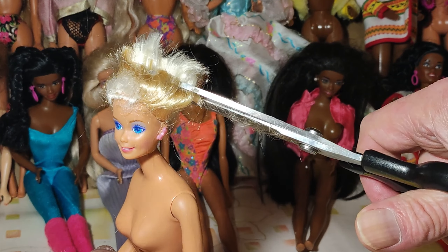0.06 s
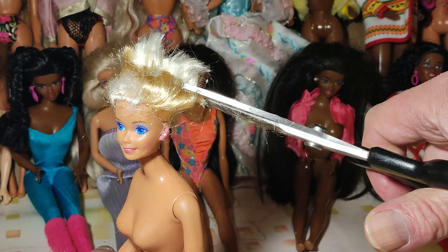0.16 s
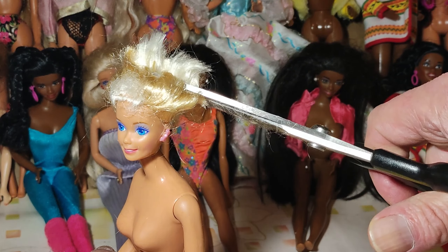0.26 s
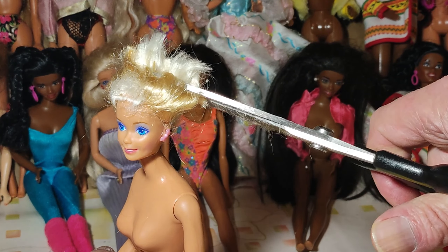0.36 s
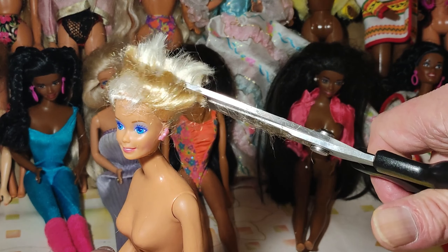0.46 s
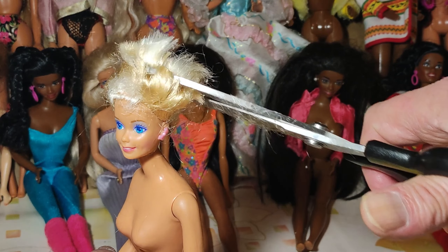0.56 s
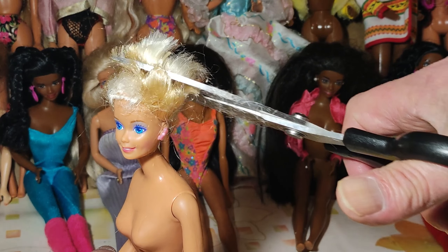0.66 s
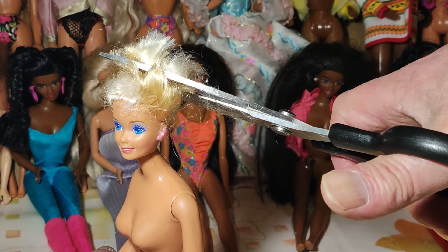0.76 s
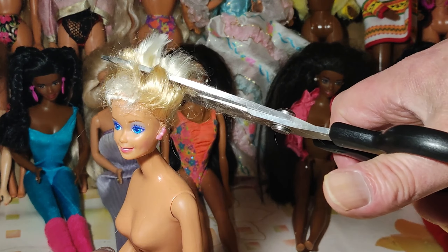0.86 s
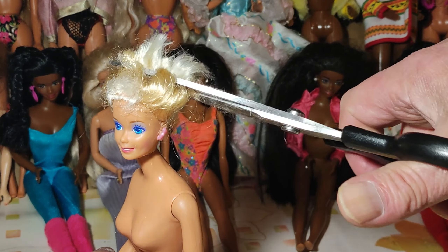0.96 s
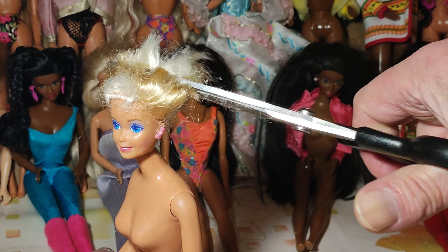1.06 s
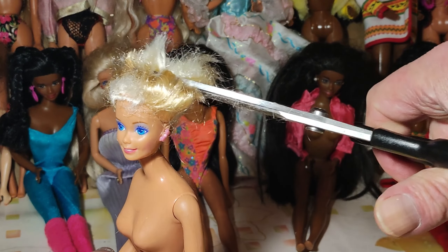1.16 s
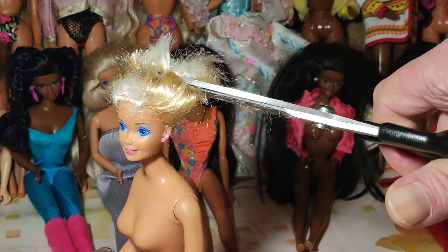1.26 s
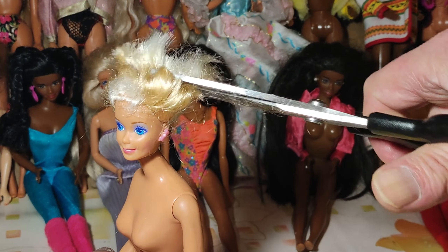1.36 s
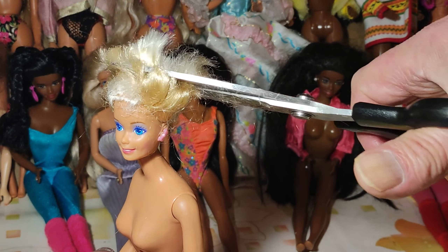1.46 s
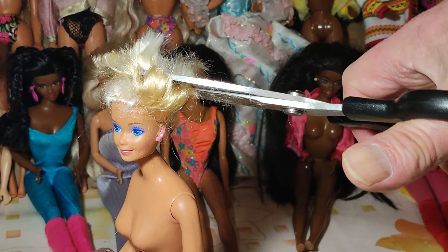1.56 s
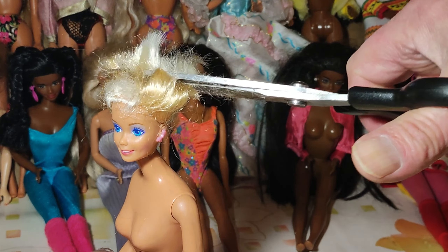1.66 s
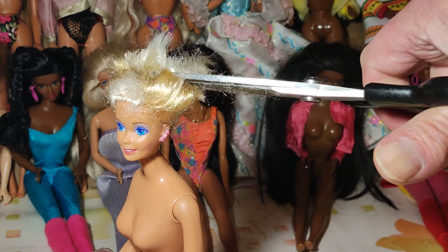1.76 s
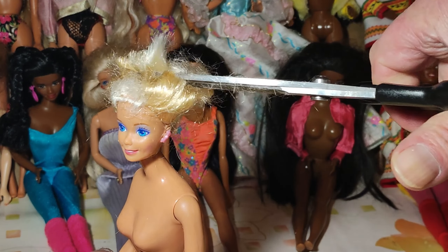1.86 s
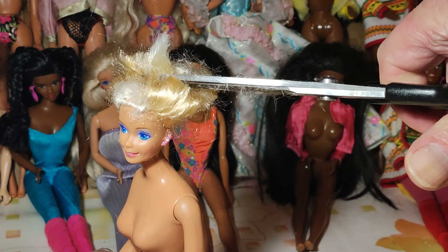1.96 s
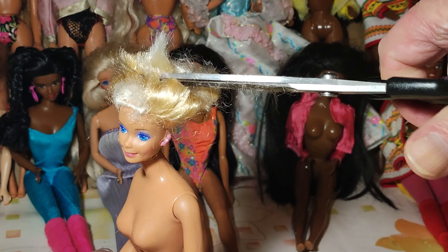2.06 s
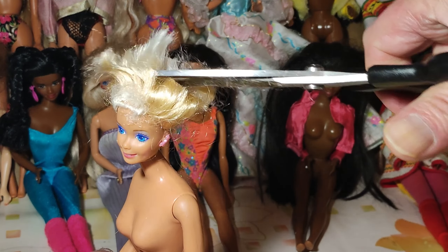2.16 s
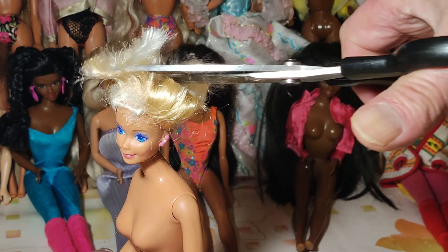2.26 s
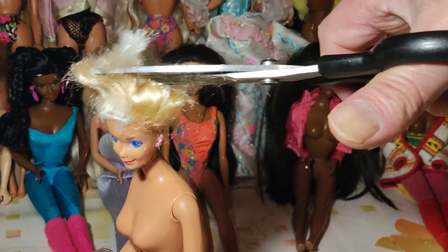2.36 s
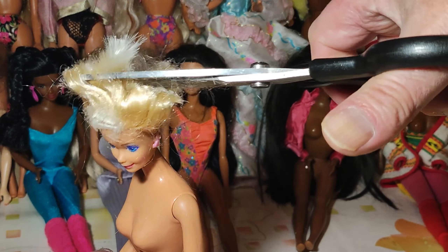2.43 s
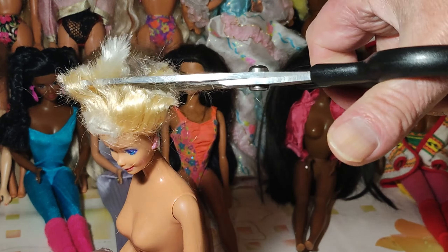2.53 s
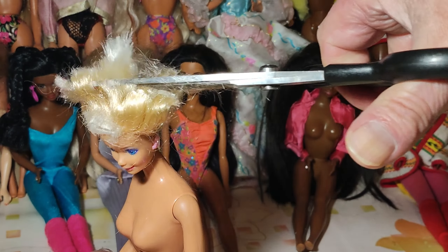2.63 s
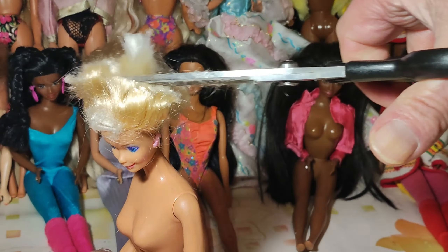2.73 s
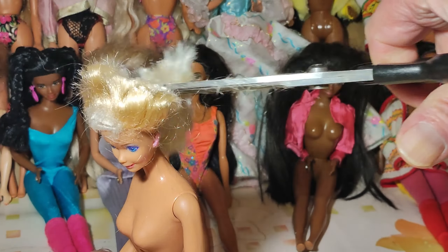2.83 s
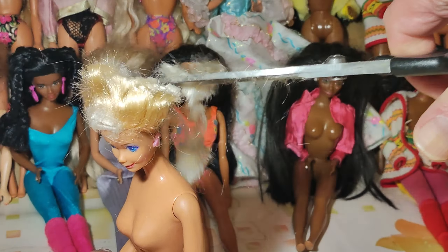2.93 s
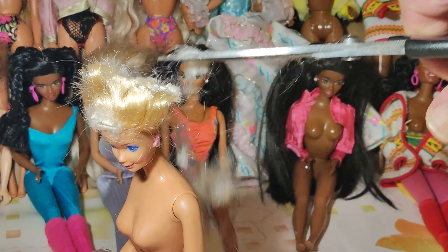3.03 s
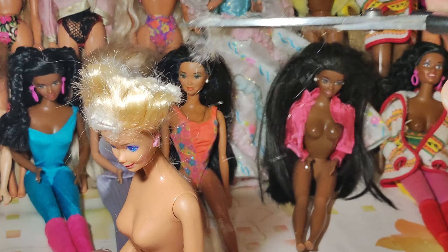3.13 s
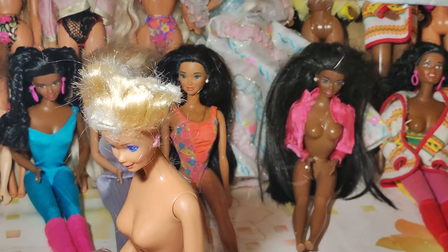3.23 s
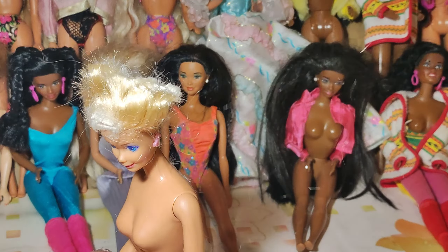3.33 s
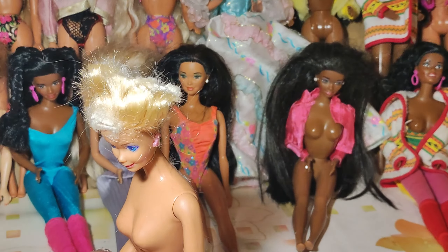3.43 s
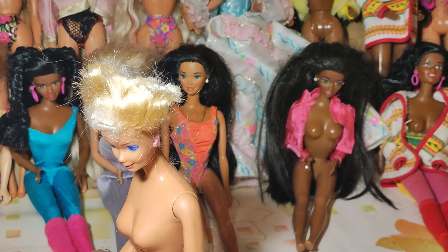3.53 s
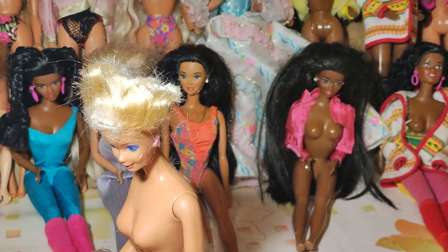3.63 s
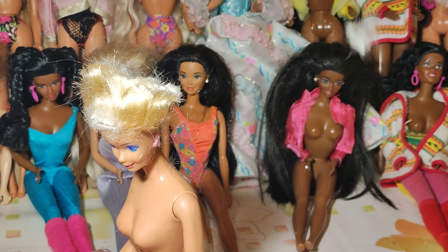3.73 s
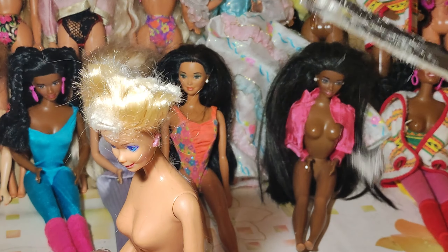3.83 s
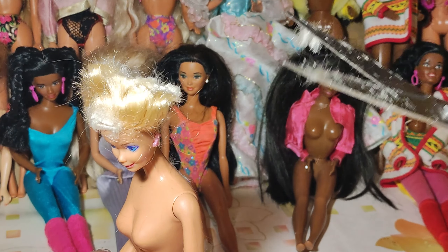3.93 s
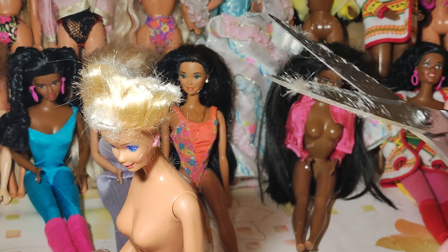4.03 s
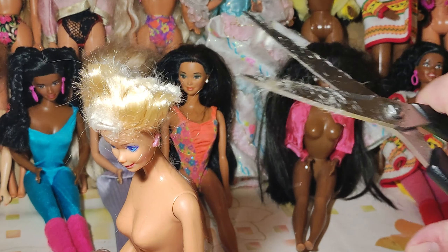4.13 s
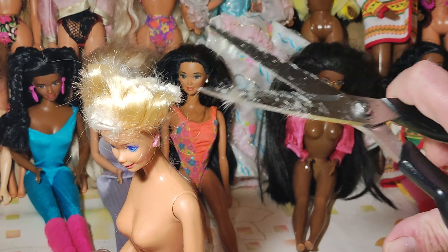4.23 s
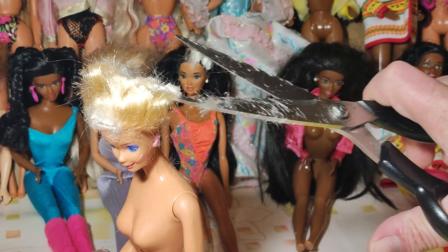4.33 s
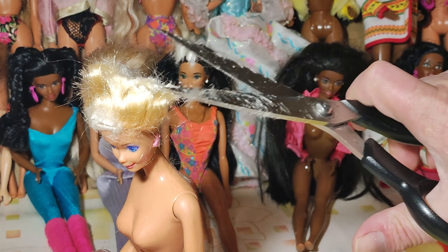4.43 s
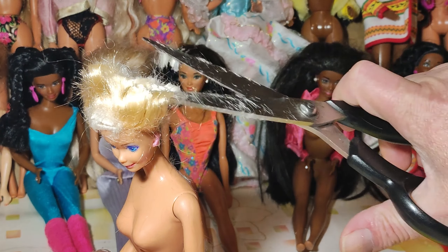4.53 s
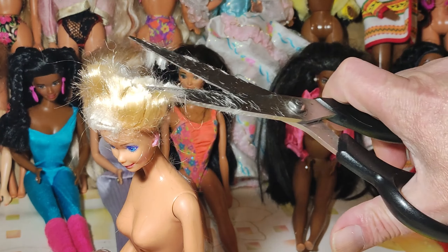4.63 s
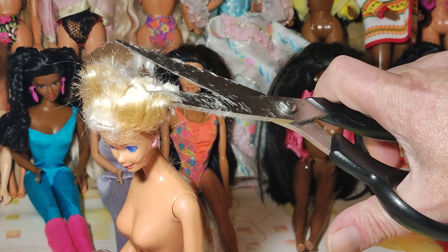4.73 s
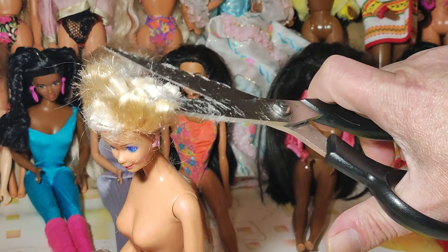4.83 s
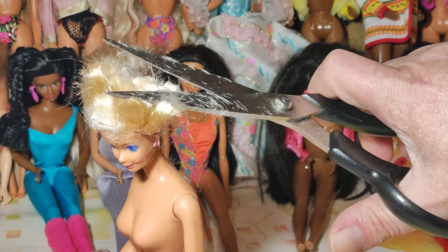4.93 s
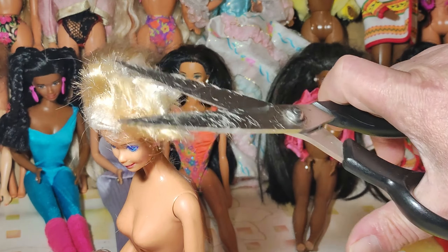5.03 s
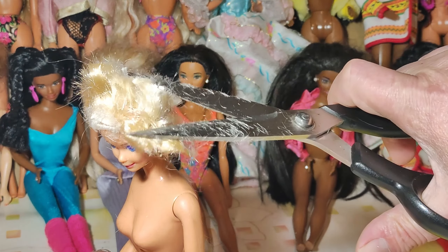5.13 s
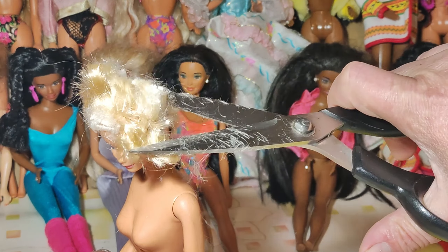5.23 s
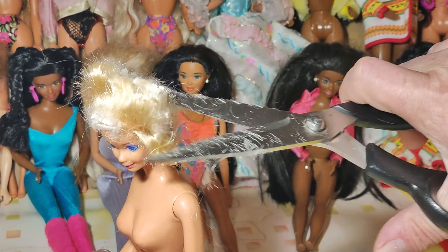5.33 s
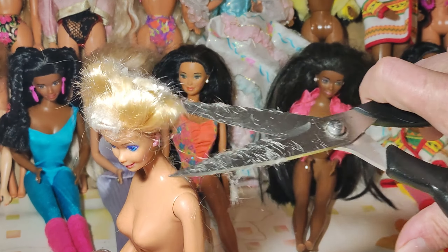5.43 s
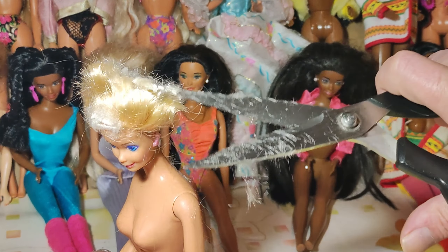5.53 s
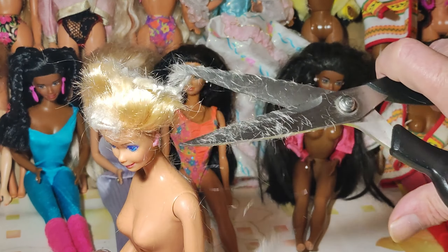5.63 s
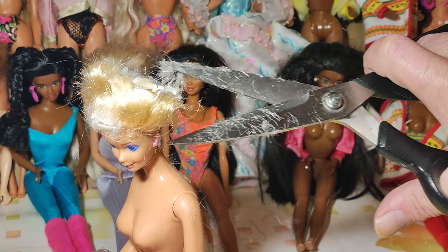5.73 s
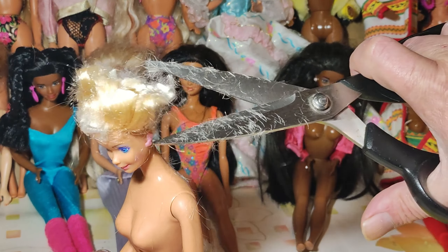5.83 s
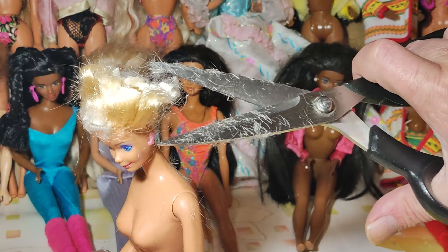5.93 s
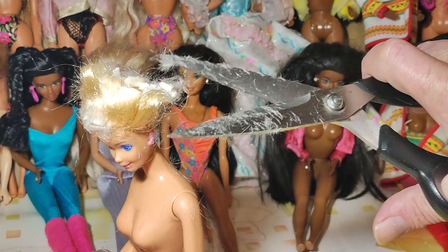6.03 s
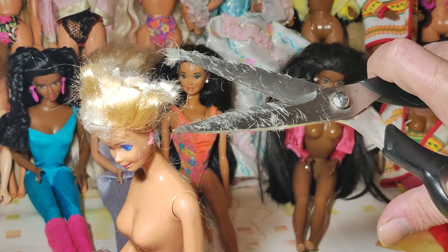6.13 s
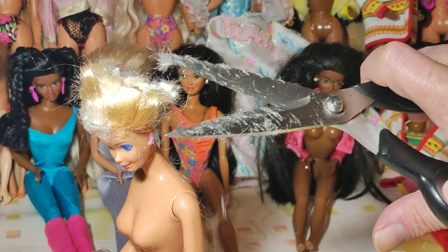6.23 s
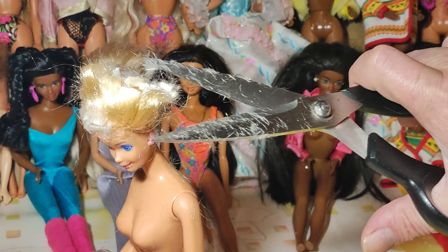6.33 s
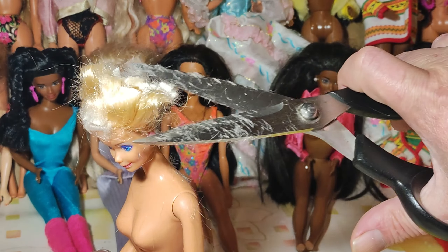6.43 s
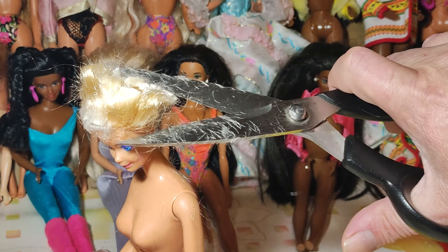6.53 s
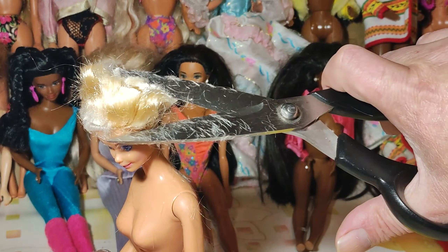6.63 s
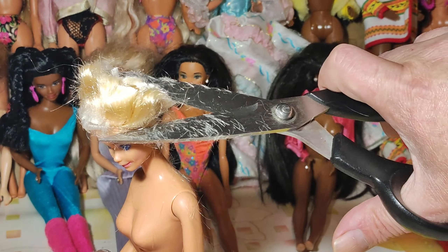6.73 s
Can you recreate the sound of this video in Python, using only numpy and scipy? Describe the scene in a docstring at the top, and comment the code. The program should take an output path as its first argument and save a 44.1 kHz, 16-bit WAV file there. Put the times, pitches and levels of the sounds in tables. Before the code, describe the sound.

Close, crisp scissor cuts through stiff plastic hair, each swelling to a crackling snip, followed by a clean shut, quiet rustles and small table bumps.

```python
"""Steel scissors chew through tufts of synthetic hair close to two ports: dense random snaps ring blade modes.
Short contacts and rattles at pivot or tips tick in the same modes; the blades shut once in a clean blow.
Decaying sines under grainy scrapes are the knocks of handles and table; faint handling rustles follow the cuts.
Echoes surround all near sounds. Lumpy low noise rumbles in gusts that mostly favour one port, with single
pressure bumps. A dull noise wash, perhaps far traffic, fades over the room's quiet hiss."""
import sys
import numpy as np
from scipy import signal
from scipy.fft import rfft, irfft, next_fast_len
from scipy.io import wavfile

SR = 44100
rng = np.random.default_rng(int(sys.argv[2]) if len(sys.argv) > 2 else 0)


def unload_wav(signal):
    """Save mono or channel-first audio to the path in sys.argv[1] as 16-bit WAV at rate SR, clipped to [-1, 1]."""
    wavfile.write(
        sys.argv[1],
        SR,
        np.round(np.clip(np.atleast_2d(signal).T, -1, 1) * 32767).astype(np.int16),
    )


N = 299439

CONTACT_FAVOUR_WIDTH = 0.1  # of ticks and the shut blow, in log frequency


def from_db(db):
    """Decibels to amplitude gain."""
    return 10 ** (np.asarray(db, float) / 20)


def rms_one(x):
    """Scale to unit power."""
    return x / np.sqrt(np.mean(x ** 2) + 1e-20)


def in_time(rows, t):
    """Columns of a curve, joined by straight lines."""
    s, *columns = np.transpose(rows)
    return [np.interp(t, s, column) for column in columns]


def coloured(spectrum):
    """Two unrelated noises whose power per Hz follows the spectrum, interpolated in log frequency."""
    size = next_fast_len(N)
    hz = np.maximum(np.arange(size // 2 + 1) * SR / size, 1)
    points = np.array(spectrum, float)
    density_db = np.interp(np.log(hz), np.log(points[:, 0]), points[:, 1])
    gain = from_db(density_db) * np.sqrt(SR / 2)
    return irfft(rfft(rng.standard_normal((2, size))) * gain, size)[:, :N]


def drift(rate_hz):
    """Slow random wander, rms 1: two-pole low-passed noise, drawn at every 20th sample."""
    step, warm_up = 20, 2000
    r = np.exp(-2 * np.pi * rate_hz * step / SR)
    noise = rng.standard_normal(N // step + warm_up + 2)
    slow = rms_one(signal.lfilter([1], [1, -2 * r, r * r], noise)[warm_up:])
    return np.interp(np.arange(N) / step, np.arange(len(slow)), slow)


def resonance(x, hz, width_hz):
    """Two-pole resonance, gain 1 on top."""
    r = np.exp(-np.pi * width_hz / SR)
    zeros = (1 - r * r) / 2 * np.array([1, 0, -1])
    poles = [1, -2 * r * np.cos(2 * np.pi * hz / SR), r * r]
    return signal.lfilter(zeros, poles, x + 1e-18)


def dying(start_s, db, t60_s, rise_s):
    """Place and envelope of one burst: quick rise, exponential fall."""
    start = round(start_s * SR)
    age = np.arange(min(int(4.2 * t60_s * SR) + 2, N - start)) / SR
    shape = from_db(db - 60 * age / t60_s) * (1 - np.exp(-age / rise_s))
    return slice(start, start + len(age)), shape


def lift_db(hz, favoured_hz, most_db, width):
    """Extra drive of a mode near the favoured pitch, bell-shaped in log frequency."""
    return most_db * np.exp(-(np.log(hz / favoured_hz) / width) ** 2)


def shearing():
    """The snaps swell, hold or fade along each stroke, change colour, and jump when a bundle gives way."""
    # strokes through hair, and from 4.27 s faint handling scrapes and rustles:
    #   (start [s], stroke length [s], first and last drive [dB], t60 after it [s],
    #   handle, rasp, middle, top modes over bright ones [dB],
    #   rasp and top loss over the stroke [dB], left over right [dB])
    strokes = [(0.03, 0.032, -64, -63.5, 0.2, 0, 8, 2.5, -2, 8, 4, 1.5),
               (0.175, 0.11, -58.5, -49.5, 0.057, -3, 3.5, 3, 1, 5.5, 4, -2),
               (0.299, 0.092, -61, -45.5, 0.15, -8, -7, 1.5, -5, 3, 4, -1),
               (0.927, 0.027, -56, -52, 0.044, -19, -19, -20, -7, -9, 0, 2.5),
               (0.977, 0.16, -44, -27, 0.12, -4, 0, -4, 0.5, 2.5, 11.5, -2),
               (1.688, 0.054, -61.5, -50.5, 0.15, -2, -5, -2, -2, -5, 3, -4),
               (1.789, 0.019, -57, -47, 0.05, -5, -4, 6.5, -6, 5, 0, -3),
               (1.807, 0.051, -35.5, -32.5, 0.23, -7, -2, -6, -24, 7, -10, 0.5),
               (1.985, 0.044, -45, -48, 0.061, -2, -3, -3, -7, 7, -1, -1),
               (2.478, 0.18, -64, -32.5, 0.17, -2.5, -1, -2, 1.5, -4, 15, -1),
               (2.694, 0.028, -30, -30, 0.024, -21, -6, -7.5, -4, 5, -1, -1.5),
               (2.753, 0.05, -40, -50.5, 0.12, -20, -14.5, -10, -7.5, -1.5, 5, -5),
               (2.84, 0.0042, -46, -46, 0.26, -20, -13, -8, -19, -2, -4, 1.5),
               (4.27, 0.022, -71, -67.5, 0.13, -0.5, 1, 1.5, -8, 2, 0, -3.5),
               (4.362, 0.016, -58, -55, 0.21, 9, -1.5, -11.5, -22.5, 1.5, 3, -2),
               (4.57, 0.28, -78.5, -71, .4, -1.5, -2, 0.5, -11, 9, 0.5, -0.5),
               (4.85, 0.058, -75.5, -77, 0.18, 1, -8.5, -10, -11.5, -1, 3, -3),
               (5.35, 0.025, -82.5, -56, 0.068, -20, -23.5, -10, -9, 0.5, 3.5, -2.5),
               (5.43, 0.051, -69.5, -77, 0.1, -10, -6.5, -12.5, -11.5, 0, 0, -3.5)]
    # bundles giving way: (time [s], drive [dB], t60 [s], favoured pitch [Hz], rasp lift [dB])
    bundles = [(0.054, -52, 0.0099, 8000, 7), (0.176, -46.5, 0.012, 9700, 5),
               (0.211, -50, 0.013, 9700, 4.5), (0.2187, -44, 0.0078, 7800, 8),
               (0.2676, -44, 0.024, 7260, 4), (0.3351, -55, 0.049, 7240, 7), (0.3715, -50, 0.027, 7350, 9),
               (0.9413, -41, 0.028, 8400, 0), (0.9815, -28, 0.011, 8850, 3), (1.002, -34, 0.0085, 8300, 0),
               (1.0237, -32, 0.066, 8200, 2), (1.042, -29, 0.041, 8350, -0.5),
               (1.059, -31, 0.031, 8600, 3.5), (1.072, -27, 0.023, 8550, 1.5),
               (1.092, -30, 0.079, 7100, -2), (1.124, -24, 0.017, 7700, -0.5),
               (1.145, -15.5, 0.0058, 7540, 0), (1.155, -15, 0.021, 8000, 0), (1.8053, -32, 0.032, 7730, 0),
               (1.829, -32, 0.03, 7500, 2.5), (1.8472, -21.5, 0.015, 7930, -2),
               (1.8668, -13.5, 0.028, 7600, 2), (1.884, -29, 0.0064, 8500, 0), (1.971, -32, 0.023, 8100, 4),
               (1.986, -25.5, 0.031, 8040, -4), (2.012, -29.5, 0.042, 8360, 6),
               (2.4844, -57.5, .02, 9240, -8), (2.5275, -43.5, 0.017, 9400, 3), (2.5596, -39, .02, 9500, 1),
               (2.5695, -46.5, 0.02, 7200, 5.5), (2.5936, -31.5, 0.013, 7280, 4),
               (2.605, -36.5, 0.0076, 7300, 1), (2.62, -30.5, 0.043, 7360, -2.5),
               (2.627, -28.5, 0.053, 7720, -3), (2.65, -20.5, 0.023, 7700, 0),
               (2.667, -22, 0.045, 8000, -4), (2.695, -18, 0.04, 7640, 0.5), (2.7208, -15, 0.026, 7400, 1),
               (2.84, -43, 0.02, 7400, -1.5)]
    # thick strands cracking alone: (time [s], relative level [dB])
    strands = [(0.2189, -34), (0.2584, -35), (0.2693, -34), (0.3735, -35), (0.3784, -35), (0.3824, -34),
               (0.3934, -33), (0.3984, -35), (0.4144, -39), (1.0934, -17), (1.0969, -16), (1.1044, -17),
               (1.1114, -17), (1.1194, -15), (1.1438, -14), (1.8282, -20), (1.8334, -20), (1.8472, -18),
               (1.8677, -12), (1.8724, -15), (1.8844, -21), (1.8964, -26), (2.5955, -27), (2.6274, -17),
               (2.6703, -15), (2.6953, -12), (2.7202, -9)]
    bite_s, bundle_rise_s = 0.003, 0.002
    middle_loss_db = 1.5
    first_snap_db, strand_blow_db = 7.5, 6  # single-sample blows over the table levels
    favour_db, favour_width = 7.5, 0.082
    own_share_low, own_share_high = 0.28, 0.5  # power unrelated between ports
    mode_wander_db, mode_wander_hz = 3, 45.0

    t = np.arange(N) / SR
    force, shares_db, pan_db = np.zeros(N), np.zeros((4, N)), np.zeros(N)
    for s, length, first_db, last_db, t60, *start_db, rasp_loss_db, top_loss_db, side_db in strokes:
        later = slice(int(s * SR) + 1, N)
        age = t[later] - s
        progress = np.minimum(age / length, 1)
        level_db = first_db + (last_db - first_db) * progress - 60 * np.maximum(age - length, 0) / t60
        force[later] += from_db(level_db) * (1 - np.exp(-age / bite_s))
        loss_db = np.outer([0, rasp_loss_db, middle_loss_db, top_loss_db], progress)
        shares_db[:, later] = np.array(start_db)[:, None] - loss_db
        pan_db[later] = side_db

    firsts, favoured_hz = np.zeros(N), np.ones(N)
    for s, db, t60, hz, rasp_db in bundles:
        span, shape = dying(s, db, t60, bundle_rise_s)
        force[span] += shape
        firsts[span.start] = from_db(db + first_snap_db)
        favoured_hz[span.start:] = hz
        shares_db[1, span.start:span.start + round(t60 * SR)] += rasp_db
    for s, db in strands:
        firsts[round(s * SR)] = from_db(db + strand_blow_db)

    common, own = snaps(), np.array([snaps(), snaps()])
    sides = from_db(np.outer([0.5, -0.5], pan_db))

    def drive(own_share):
        texture = np.sqrt(1 - own_share) * common + np.sqrt(own_share) * own
        return sides * (firsts + force * texture)

    def strength(hz):
        wander_db = mode_wander_db * drift(mode_wander_hz)
        return from_db(wander_db + lift_db(hz, favoured_hz, favour_db, favour_width))

    low, high = drive(own_share_low), drive(own_share_high)
    handle, rasp, middle, top = from_db(shares_db)
    return blades([low, low, low, high, high], [handle, rasp, middle, 1, top], strength)


def snaps():
    """Strands break at random moments with uneven force, over the hiss of steel on steel; rms 1."""
    median_rate_hz, rate_wander_db, rate_wander_hz = 2200, 5.0, 200.0
    size_spread_db = 4.8
    size_db = size_spread_db * np.minimum(rng.exponential(1, N), 3.5)
    sizes = from_db(size_db) * rng.choice([-1, 1], N)
    chance = median_rate_hz * from_db(rate_wander_db * drift(rate_wander_hz)) / SR
    breaks = sizes * (rng.random(N) < chance)
    return rms_one(rms_one(breaks) + 0.42 * rng.standard_normal(N))


def blades(drives, shares, strength, turn=-1):
    """Parallel modes hear the blows by family share and mode strength; turn=-1 alternates their polarity."""
    # scissor modes, low to high family: (frequency [Hz], width [Hz], gain [dB])
    handle_modes = [(250.7, 120, -1.5), (423, 190, -8)]
    rasp_modes = [(930, 170, -7), (1510, 340, -7.5), (2330, 280, 10), (2605, 320, 12)]
    middle_modes = [(1711, 380, -12.5), (2060, 430, -3.5), (2810, 1020, 6.5), (3410, 300, 10),
                    (3620, 380, 7), (4190, 180, 7.5), (4340, 79, 9), (5040, 350, 5), (5330, 250, 6.5),
                    (6000, 350, 2.5), (6480, 280, 8)]
    bright_modes = [(7000, 200, 5.3), (7330, 310, 5), (7595, 530, 4.7), (8130, 310, 4.65),
                    (8590, 240, 2.74), (9010, 240, 3.9), (9380, 120, 5.1), (10060, 97, 1)]
    top_modes = [(10590, 500, 6.5), (12200, 900, 4.5), (12700, 770, 5.5), (14450, 480, 6), (14680, 500, 5),
                 (15580, 190, 2.3)]
    families = (handle_modes, rasp_modes, middle_modes, bright_modes, top_modes)
    out, sign = 0, 1
    for drive, share, family in zip(drives, shares, families):
        for hz, width_hz, db in family:
            ring = resonance(drive * share * strength(hz), hz, width_hz)
            out = out + sign * from_db(db) * ring
            sign = turn * sign
    return out


def ticks():
    """A sharp contact and short rattle ring the blade modes, most of all those near the favoured pitch."""
    # metal on metal at pivot or tips:
    #   (time [s], relative level [dB], middle modes [dB], top modes [dB], favoured pitch [Hz])
    contacts = [(0.5526, -25.5, -13, -4, 6060), (1.097, -26, -24, 6.5, 14900),
                (1.693, -35.5, -16, -9, 6000), (1.79, -40, -5, -4, 6650), (2.363, -27.5, -10.5, -10, 5770),
                (2.4842, -44, -22, -4, 3670), (2.748, -19, -6, -3, 4770), (2.7505, -14, -4, 0, 6100),
                (3.096, -34, -18, -9, 5870), (3.1, -30, -20.5, -2, 5780), (3.1496, -32, -15, -3, 5600),
                (3.8521, -42, -11, -15, 4940), (3.967, -35.5, -2, -5, 8930), (3.974, -43, -7, -15, 8030),
                (3.9756, -47, -8, -11, 8900), (4.057, -45.5, -14, -5, 5250),
                (5.9045, -27.5, -9, -3.5, 5900), (5.9063, -35.5, -8, 0, 9400),
                (5.9075, -38, -10, -10, 4200), (5.91, -37, -14, -10, 8370), (5.915, -51, -10, -13.5, 8820)]
    rattle_db, contact_db = -3, 10  # over the table level
    rattle_t60_s, low_modes_db, favour_db = 0.007, -20, 15.5
    drives, white, favoured_hz = np.zeros((5, 2, N)), rng.standard_normal((2, N)), np.ones(N)
    for s, db, middle_db, top_db, hz in contacts:
        span, shape = dying(s, db + rattle_db, rattle_t60_s, rise_s=0.00029)
        hit = shape * white[:, span]
        hit[:, 1] += from_db(db + contact_db)
        shares = from_db([low_modes_db, low_modes_db, middle_db, 0, top_db])
        drives[:, :, span] += hit * shares[:, None, None]
        favoured_hz[span] = hz

    def strength(hz):
        return from_db(lift_db(hz, favoured_hz, favour_db, CONTACT_FAVOUR_WIDTH))

    return blades(drives, [1, 1, 1, 1, 1], strength)


def shut():
    """The blades shut in one blow: all modes start in step, so it is sharp and soon over."""
    # (time [s], blow [dB], rasp, middle, top modes [dB], favoured pitch [Hz], left over right [dB])
    shut_blow = (2.7502, -2, -12, -6, -3, 7300, -2)
    favour_db = 10
    s, db, rasp_db, middle_db, top_db, favoured_hz, pan_db = shut_blow
    start, length = round(s * SR), SR // 10
    out, blow = np.zeros((2, N)), np.zeros((2, length))
    blow[:, 0] = from_db([db + pan_db / 2, db - pan_db / 2])
    shares = from_db([rasp_db, rasp_db, middle_db, 0, top_db])

    def strength(hz):
        return from_db(lift_db(hz, favoured_hz, favour_db, CONTACT_FAVOUR_WIDTH))

    out[:, start:start + length] = blades([blow] * 5, shares, strength, turn=1)
    return out


def knocks():
    """Handles and table: a damped sine thud with a grainy scrape of filtered snaps on top."""
    # (time [s], thud level [dB], pitch [Hz], thud t60 [s], scrape level [dB], scrape t60 [s])
    thuds = [(1.73, -48.5, 252, 0.19, -72, .1), (2.362, -47, 294, 0.036, -73, 0.12),
             (2.7505, -22, 1250, 0.008, -64, 0.096), (4.285, -67.5, 886, .04, -63, .05),
             (4.3795, -37, 600, 0.008, -54, 0.2), (4.3845, -38, 520, 0.008, -60, 0.05),
             (4.3905, -45, 700, 0.008, -60, 0.05), (4.427, -49, 412, 0.062, -67, 0.046),
             (4.442, -44, 380, 0.05, -65, 0.046), (5.531, -63, 203, 0.1, -83, .1),
             (5.887, -41.5, 243, 0.16, -63, 0.1), (5.889, -52, 385, 0.12, -62.5, 0.088)]
    grit_cut_hz = 2200
    dull = signal.sosfilt(signal.butter(2, grit_cut_hz, fs=SR, output="sos"), snaps())
    grit = rms_one(signal.lfilter([1, -1], [1, -1.8, 0.81], dull))
    out = np.zeros(N)
    for s, db, hz, t60, scrape_db, scrape_t60 in thuds:
        span, shape = dying(s, db, t60, rise_s=0.00054)
        out[span] += shape * np.sin(2 * np.pi * hz * np.arange(len(shape)) / SR)
        span, shape = dying(s, scrape_db, scrape_t60, rise_s=0.0015)
        out[span] += shape * grit[span]
    return out


def surroundings(x):
    """Direct sound, echoes off near objects and the room's short tail, as decaying noise unlike at each port."""
    near_db, near_t60_s = -12, 0.047  # energy over the direct sound
    room_db, room_t60_s = -6, 0.18
    age = np.arange(int(0.25 * SR)) / SR
    near, far = rng.standard_normal((2, 2, len(age))) * (age > 0.0003)
    echoes = from_db(near_db) * rms_one(near * from_db(-60 * age / near_t60_s))
    tail = from_db(room_db) * rms_one(far * from_db(-60 * age / room_t60_s))
    answer = (echoes + tail) / np.sqrt(len(age))
    answer[:, 0] = 1
    return signal.fftconvolve(x, answer, axes=1)[:, :N]


def rumble():
    """Low pressure noise, unrelated between ports: a wandering calm, and gusts that mostly favour one side."""
    # (start [s], length [s], relative deep level [dB], upper over deep [dB], left over right [dB])
    gusts = [(0.44, 0.16, -35, -4.5, 31), (0.571, 0.2, -41.5, -1, 25), (0.8, 0.75, -60.5, -20, -1),
             (1.697, 1.03, -63.5, -17, -2), (2.807, 0.31, -69, -20, 1), (3.695, 0.23, -58.5, -6.5, 19),
             (3.841, 0.3, -48.5, -15.5, 26.5), (4.078, 0.2, -60.5, -3, 13), (5.78, 0.31, -61, -13, -5),
             (6.156, 0.28, -58, -17.5, -16.5)]
    # relative densities: (frequency [Hz], power per Hz [dB])
    deep_colour = [(12, -6), (25, -1), (45, -2.5), (70, -19.5), (150, -61)]
    upper_colour = [(35, -26.5), (55, -5), (80, 0.5), (110, -5), (160, -17.5), (300, -68.5)]
    calm_db, calm_upper_db = -63, -7  # relative deep level; upper over deep
    calm_wander_db, calm_wander_hz = 0.5, 3.8
    edge_s, lump_db, lump_hz = 0.043, 1.7, 11.0
    t = np.arange(N) / SR
    calm = from_db(calm_db + calm_wander_db * drift(calm_wander_hz))
    deep = calm * np.sqrt([[0.5], [0.5]])
    upper = deep * from_db(calm_upper_db)
    for s, length, db, upper_db, pan_db in gusts:
        shape = np.clip(np.minimum(t - s, s + length - t) / edge_s, 0, 1) ** 2
        sides = np.array([[from_db(pan_db)], [1]]) / np.sqrt(1 + from_db(2 * pan_db))  # constant total power
        deep = deep + from_db(db) * shape * sides
        upper = upper + from_db(db + upper_db) * shape * sides
    swings = deep * rms_one(coloured(deep_colour)) + upper * rms_one(coloured(upper_colour))
    return 2 * from_db(lump_db * drift(lump_hz)) * swings


def bumps():
    """One smooth pressure swing, stronger at the nearer port."""
    # (start [s], relative level [dB], swing [Hz], left over right [dB])
    pressure_swings = [(3.767, -25.5, 61.4, 32), (5.936, -47, 29.8, -20), (6.067, -40, 36, -25.5),
                       (6.218, -34.5, 49.8, -25)]
    out = np.zeros((2, N))
    for s, db, hz, pan_db in pressure_swings:
        turn = np.arange(int(SR / hz)) * hz / SR
        swing = from_db(db) * np.sin(2 * np.pi * turn) * np.sin(np.pi * turn) * np.sign(pan_db)
        sides = from_db([[min(pan_db, 0)], [min(-pan_db, 0)]])
        start = round(s * SR)
        out[:, start:start + len(turn)] += swing * sides
    return out


def wash():
    """Dull noise from afar with a hollow resonant note, partly alike at both ports, flickering a little."""
    # (time [s], relative level [dB], relative level of hollow note [dB])
    wash_levels = [(0.0, -61, -83), (0.53, -56.5, -53.5), (0.83, -59.5, -65), (1.23, -56.5, -71),
                   (1.97, -65.5, -66), (2.8, -69, -90), (3.37, -74.5, -71), (3.74, -67.5, -60.5),
                   (4.22, -73.5, -67), (4.54, -65.5, -65), (5.5, -82.5, -79.5), (6.07, -79, -67),
                   (6.79, -78, -85)]
    # relative density: (frequency [Hz], power per Hz [dB])
    wash_colour = [(88, -42), (150, -7.5), (277, -4.5), (493, -6.5), (634, -11.5), (947, -1.5),
                   (1160, -7.5), (1260, -11.5), (1890, -10), (2170, -19.5), (3000, -22), (3900, -41.5),
                   (6600, -120)]
    note_hz, note_width_hz = 466, 136
    alike = 0.46  # correlation between ports
    flicker_db, flicker_hz = 2.2, 15.0
    level_db, note_db = in_time(wash_levels, np.arange(N) / SR)
    note = rms_one(resonance(rng.standard_normal((2, N)), note_hz, note_width_hz))
    dull = rms_one(coloured(wash_colour))
    mid, side = from_db(level_db) * dull + from_db(note_db - 3.5) * note
    both = np.sqrt(1 + alike) * mid + np.sqrt(1 - alike) * side * [[1], [-1]]
    return both * from_db(flicker_db * drift(flicker_hz))


def room_hiss():
    """Quiet coloured noise, unrelated between ports, with a quick flicker and a slow drift of level."""
    # (frequency [Hz], power per Hz before flicker [dB])
    room_tone = [(20, -68), (60, -92), (150, -86.5), (500, -96.5), (1100, -98), (2300, -104), (5000, -107),
                 (10000, -109), (16000, -108)]
    flicker_db, flicker_hz = 1.2, 12.0
    drift_db, drift_hz = 1.2, 1.5
    return coloured(room_tone) * from_db(flicker_db * drift(flicker_hz) + drift_db * drift(drift_hz))


def scene():
    """Near sources in their surroundings over rumble, bumps, wash and hiss."""
    near = shearing() + ticks() + shut() + knocks()
    return surroundings(near) + rumble() + bumps() + wash() + room_hiss()


def record(dry):
    """The cavity before each capsule lifts or dips some bands; the top is cut."""
    # (frequency [Hz], width [Hz], gain [dB])
    left_port = [(7730, 710, 7), (8430, 400, 8.5), (2533, 1500, -1)]
    right_port = [(7400, 4400, -15.5), (8180, 1400, -24.5), (9230, 640, 9.5)]
    cutoff_hz = 15800
    out = []
    for x, port in zip(dry, (left_port, right_port)):
        for hz, width_hz, db in port:
            x = x + (from_db(db) - 1) * resonance(x, hz, width_hz)
        out.append(x)
    top_cut = signal.ellip(12, 0.5, 60, cutoff_hz, fs=SR, output="sos")
    return signal.sosfilt(top_cut, np.array(out))


dry = scene()
out = record(dry)
unload_wav(out)
```